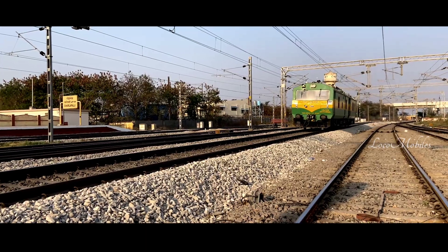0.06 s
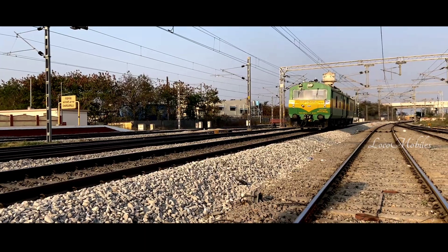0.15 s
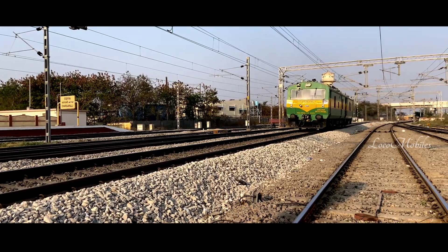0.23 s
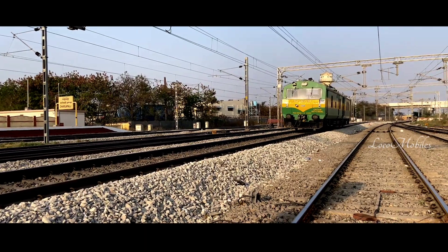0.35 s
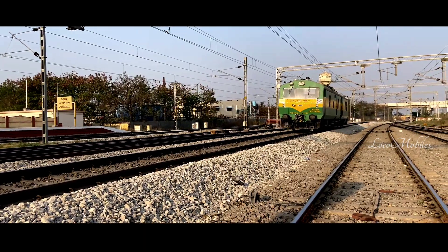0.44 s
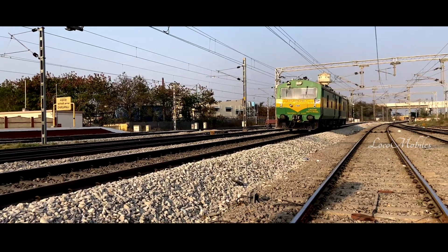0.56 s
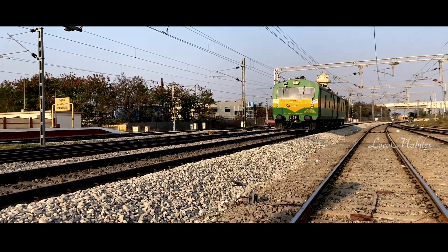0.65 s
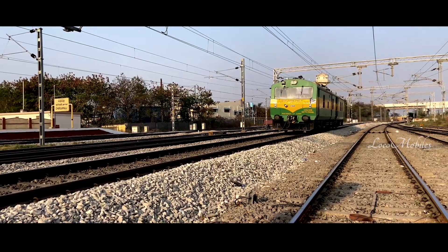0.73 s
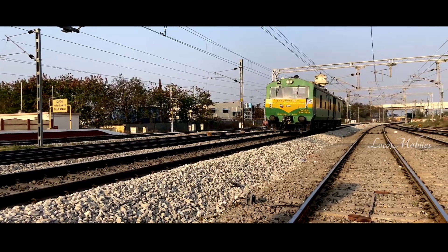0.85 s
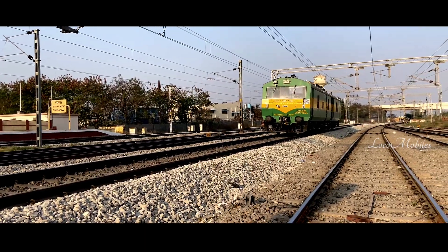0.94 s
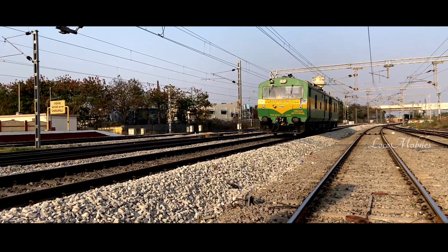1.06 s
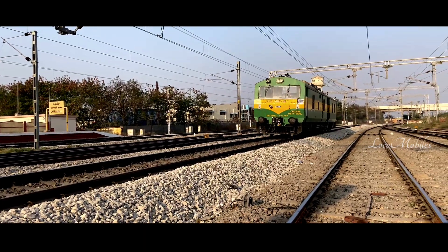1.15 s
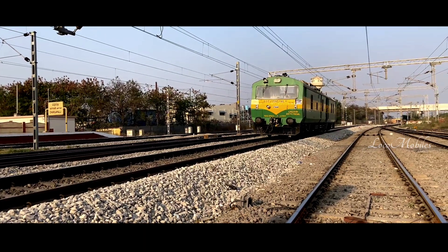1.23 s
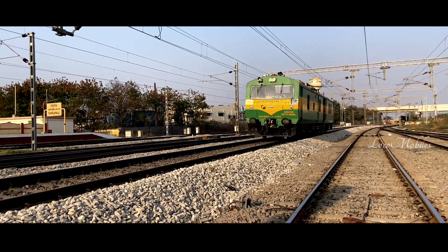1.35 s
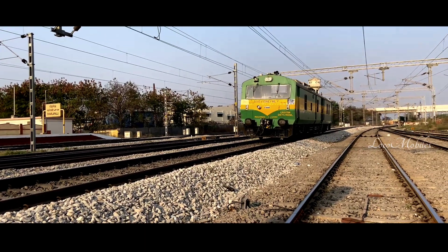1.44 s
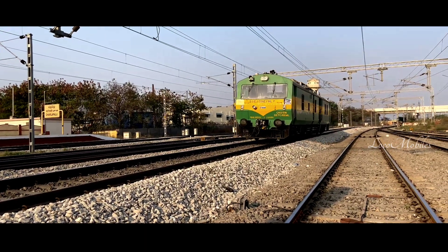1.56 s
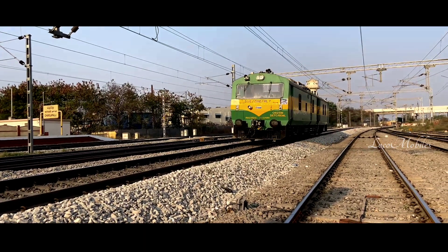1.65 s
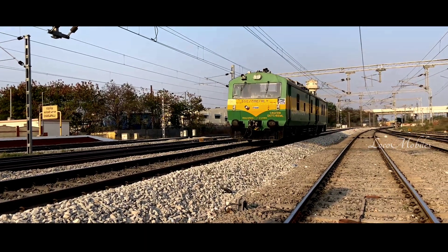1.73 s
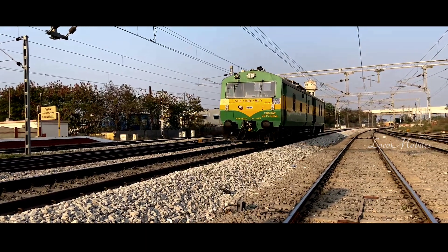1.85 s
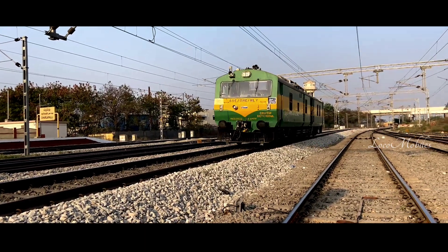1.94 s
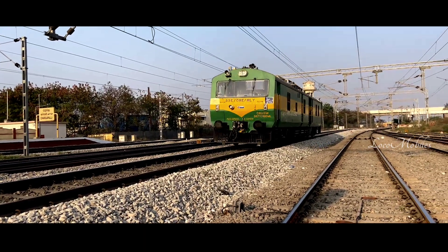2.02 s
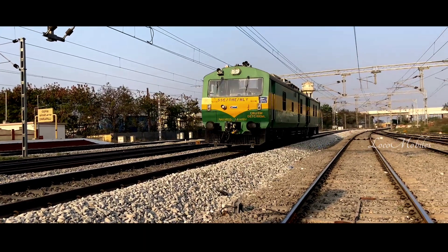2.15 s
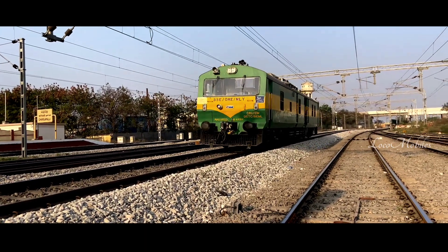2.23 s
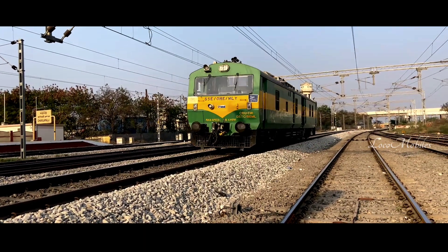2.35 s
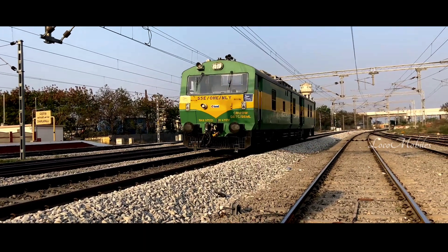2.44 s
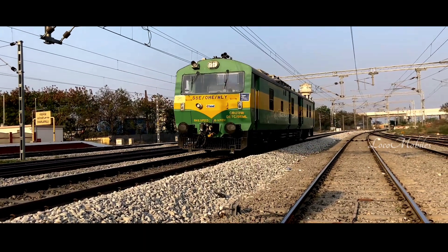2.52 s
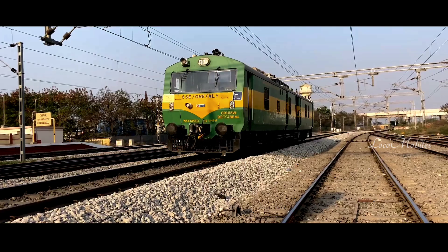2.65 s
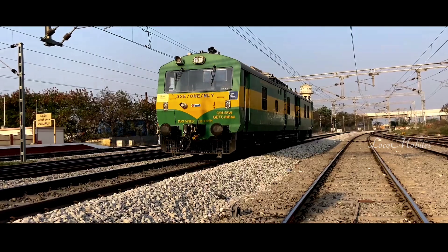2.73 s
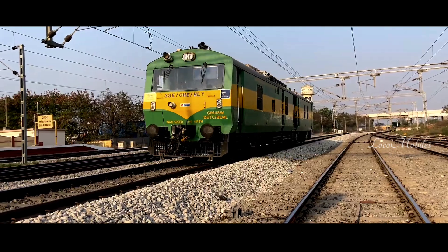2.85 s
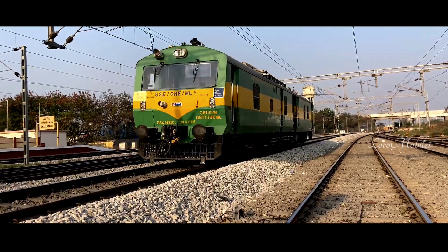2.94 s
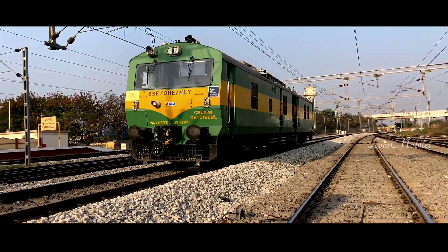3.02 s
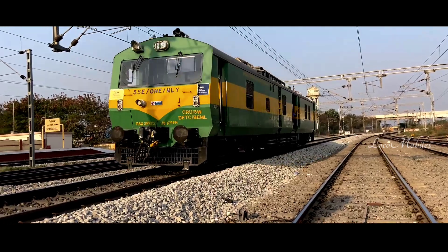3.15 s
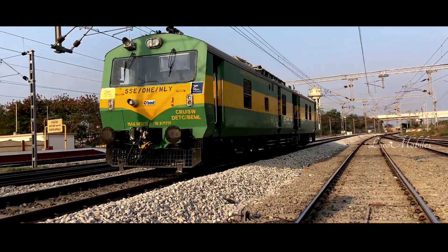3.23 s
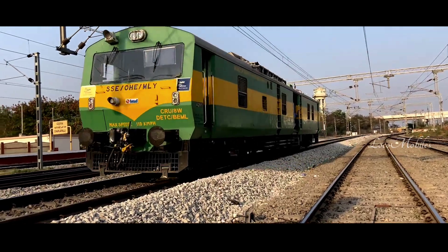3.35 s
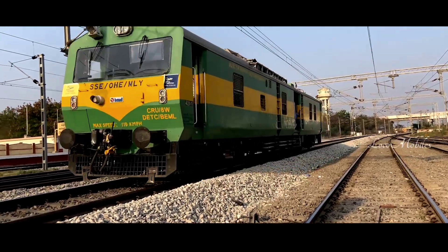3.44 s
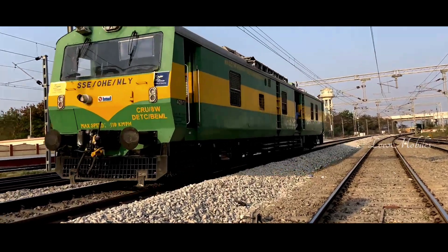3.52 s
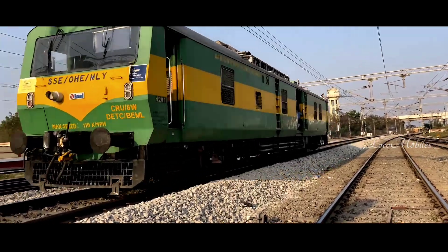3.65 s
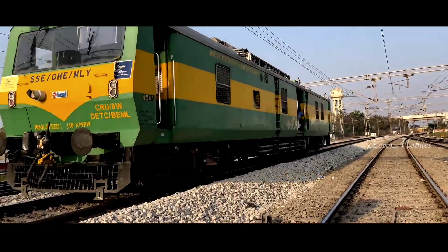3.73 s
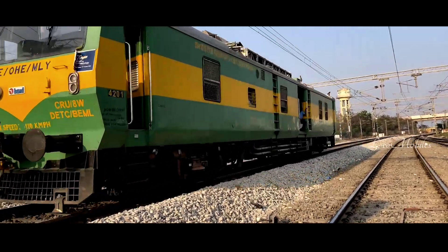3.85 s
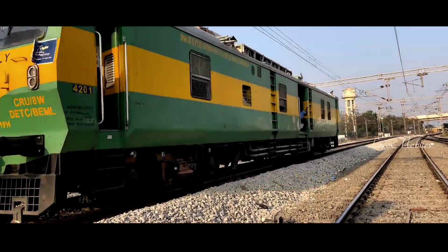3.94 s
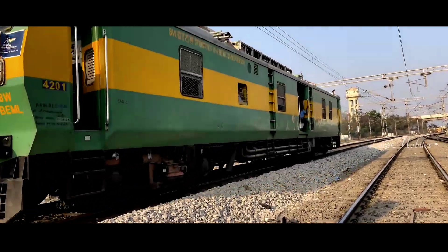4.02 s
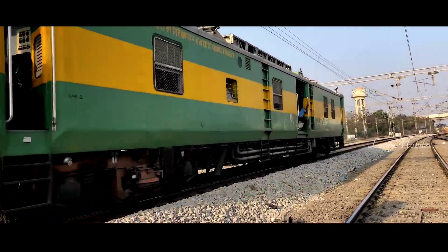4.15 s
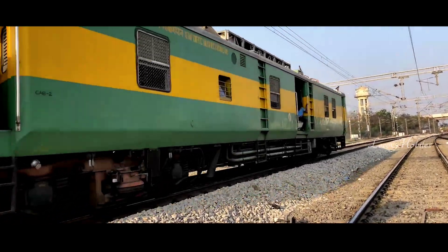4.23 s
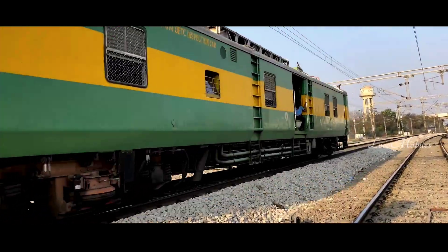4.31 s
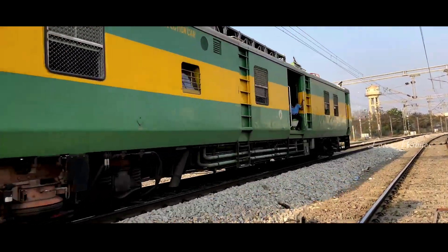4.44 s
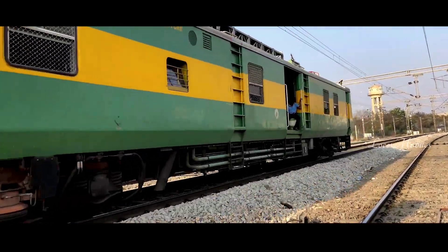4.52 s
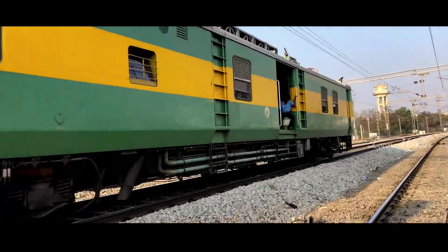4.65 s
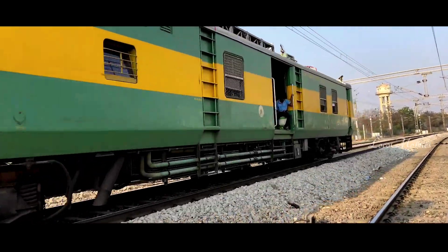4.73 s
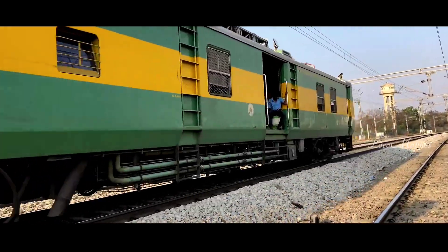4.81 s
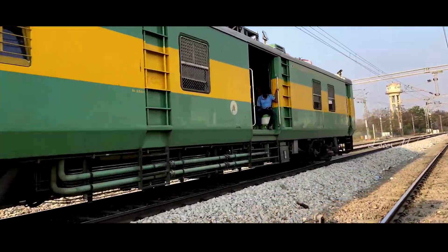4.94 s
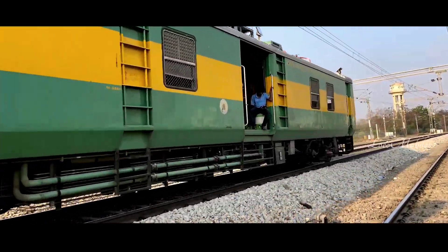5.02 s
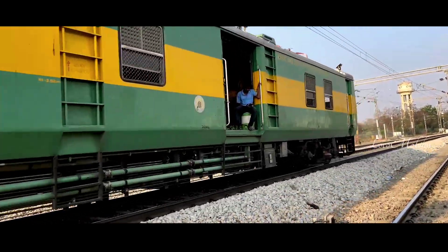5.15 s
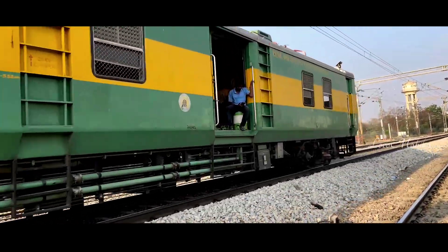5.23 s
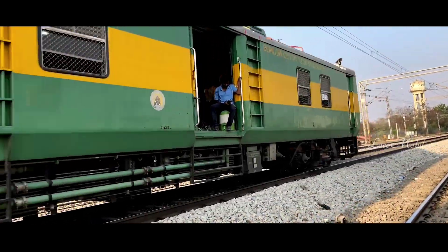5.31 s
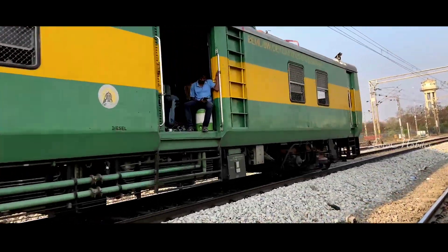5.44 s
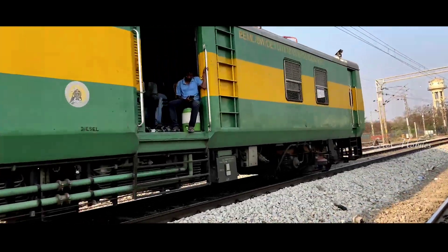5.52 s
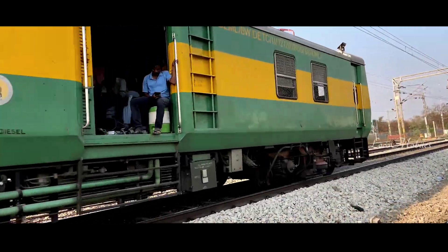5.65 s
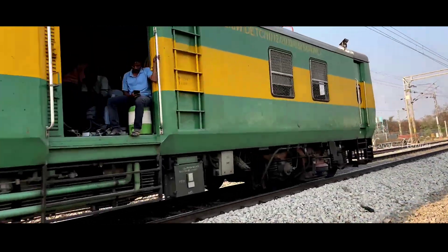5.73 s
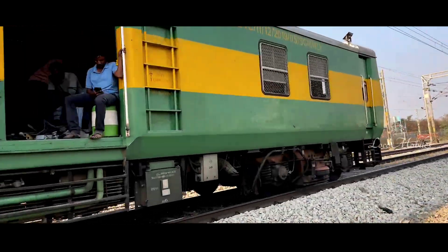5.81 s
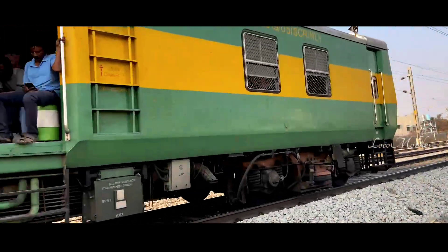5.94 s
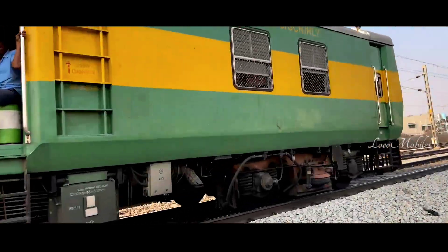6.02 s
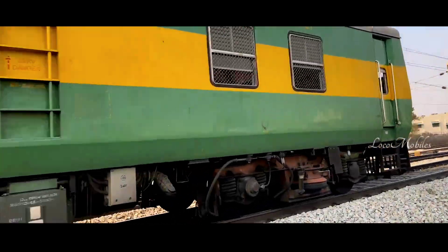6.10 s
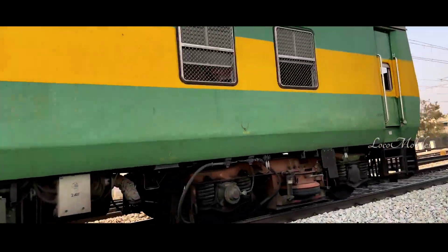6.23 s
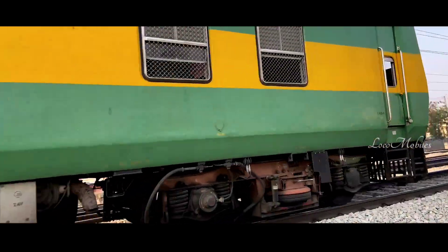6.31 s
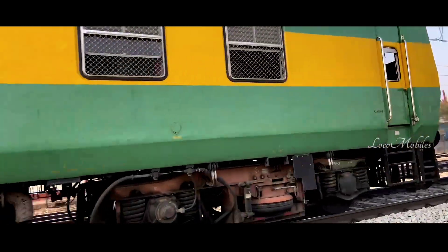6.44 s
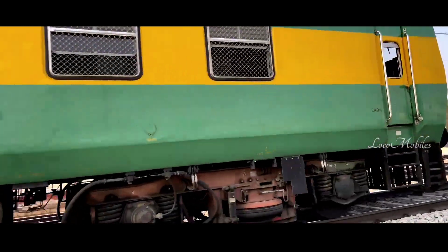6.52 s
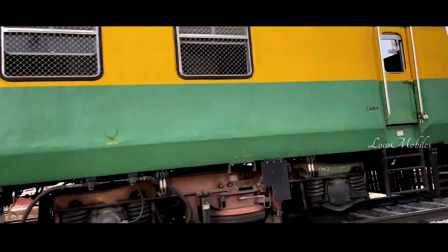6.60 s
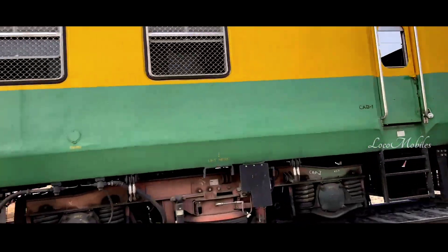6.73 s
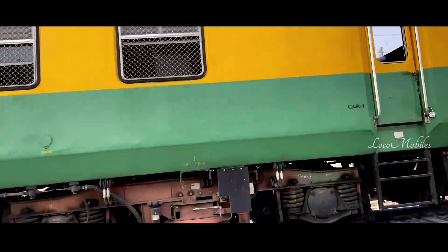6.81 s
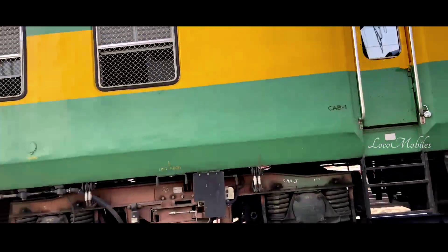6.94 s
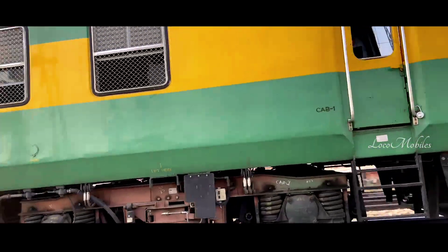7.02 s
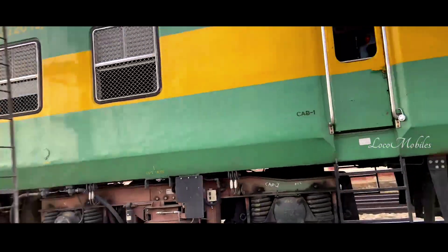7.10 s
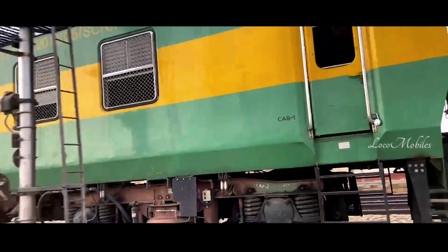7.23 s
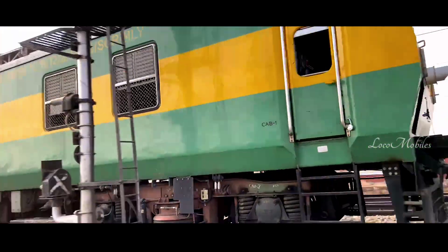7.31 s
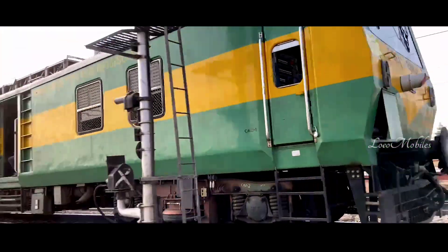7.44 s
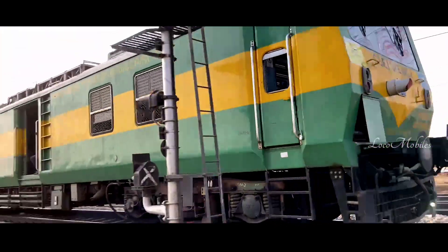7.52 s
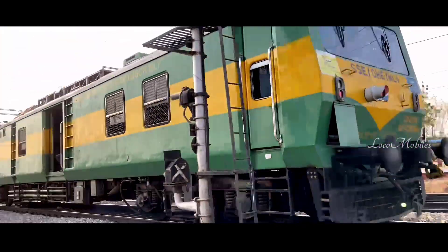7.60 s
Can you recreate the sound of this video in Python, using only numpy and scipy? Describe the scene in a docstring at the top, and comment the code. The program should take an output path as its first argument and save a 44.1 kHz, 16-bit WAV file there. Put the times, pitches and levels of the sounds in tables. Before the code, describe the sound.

Low steady diesel drone grows as the throttle opens, wheels and engine clatter roar past at a few metres, with faint whistle and light wind buffeting.

```python
"""A diesel railcar nears through a station yard: exhaust booms at the firing rate, engines growl, hum, whistle
and clatter (tones, shaped noise beaten by the firings), wheels roar, dull knocks sound, a breeze buffets two ports.
The throttle opens in two steps and air hisses once on the way in (noise under a level curve).
The car passes a few metres to the left, levels going as 1 / r; loose parts buzz as resonant noise.
Last, the rear engine's covers ring with uneven ticks, and the body screens the engine sounds."""
import sys
import numpy as np
from scipy import signal
from scipy.fft import rfft, irfft, next_fast_len
from scipy.io import wavfile
from scipy.ndimage import uniform_filter1d, map_coordinates

SR = 44100
rng = np.random.default_rng(int(sys.argv[2]) if len(sys.argv) > 2 else 0)


def wav_out(sig):
    """Save sig, one row per channel (or a flat mono array), as 16-bit PCM at SR to the path in sys.argv[1]."""
    wavfile.write(sys.argv[1], SR, np.round(np.clip(np.atleast_2d(sig).T, -1, 1) * 32767).astype(np.int16))


N = 338158
TIME = np.arange(N) / SR

# driver opens the throttle in two steps: t/s, exhaust strength/dB
THROTTLE = [(0.0, -23), (0.5, -16), (0.72, -9.5), (1.78, -11.5), (1.92, -3.5), (2.7, 0)]
# rear engine, which stays ahead for longer: t/s, lead of left port/ms, share of direct sound (0-1)
REAR_PLACE = [(0, -0.11, 0.07), (1.7, -0.041, 0.42), (3.9, -0.019, 0.3), (4.6, 0.01, 0), (5.9, -0.059, 0.1),
              (6.5, 0.27, 0.07), (7.05, 0.29, 0.45), (7.4, 0.18, 0.18)]
BOOM_DB, BOOM_DISTANCE_M = -11.9, 19  # abreast, before throttle and fades; the boom carries far
FLICKER_DB = 1.8  # size of the random flicker in the clatter


def undb(db):
    """Decibels to gain."""
    return 10 ** (np.asarray(db) / 20)


def curves(table):
    """Each column of a table, joined by straight lines in time."""
    s, *columns = np.transpose(table)
    return [np.interp(TIME, s, c) for c in columns]


def unit(x):
    """Scale to rms 1."""
    return x / np.sqrt(np.mean(x ** 2))


def noise(channels=2):
    """Unrelated white noise for each channel."""
    return rng.standard_normal((channels, N))


def walk(rate_hz):
    """Random levels held 1 / rate s and slewed; rms 1."""
    hold = int(SR / rate_hz)
    steps = np.repeat(rng.standard_normal(N // hold + 1), hold)
    slewed = uniform_filter1d(uniform_filter1d(steps, hold), hold)
    return unit(slewed[:N])


def colour(x, spectrum):
    """Give x a spectrum of (Hz, dB) points; rms 1."""
    size = next_fast_len(N, True)
    f = np.maximum(np.fft.rfftfreq(size, 1 / SR), 1)
    hz, db = np.transpose(spectrum)
    gain = undb(np.interp(np.log(f), np.log(hz), db, left=-80, right=-80))
    return unit(irfft(rfft(x, size) * gain, size)[..., :N])


def ports(x, lead_ms):
    """A sound from one side reaches the two ports at different times."""
    half = lead_ms / 2000 * SR  # samples
    return np.array([map_coordinates(x, [np.arange(N) + side * half], order=3, mode="nearest")
                     for side in (1, -1)])


def diffuse(lead_ms):
    """Diffuse sound; part of it reaches both channels with fixed delays, mostly from the car's side."""
    # two fixed delays between the channels: delay/ms
    delays_ms = [0.28, 0.44]
    delayed_share, left_lean = 0.59, 0.2
    share = np.clip(delayed_share, 0, 1)
    lean = np.clip(left_lean + lead_ms / max(delays_ms), -1, 1)
    out = np.sqrt(1 - share) * noise()
    for ms in delays_ms:
        for side in (1, -1):
            wave = noise(channels=1)[0] * np.sqrt(share * (1 + side * lean) / (2 * len(delays_ms)))
            out += [wave, np.roll(wave, side * round(ms * SR / 1000))]
    return out


def radiate(x, lead_ms, direct):
    """The direct sound plus noise for its scatter from ballast and underframe."""
    direct = np.clip(direct, 0, 1)
    return np.sqrt(direct) * ports(x, lead_ms) + np.sqrt(1 - direct) * diffuse(lead_ms)


def nearness(behind_m, distance_m):
    """Gain 1 / r of a point on the moving car; 1 when it is abreast."""
    speed_m_s, front_abreast_s = 7.27, 4.214
    along_m = speed_m_s * (TIME - front_abreast_s) - behind_m
    return distance_m / np.hypot(along_m, distance_m)


def heard(sound):
    """Gain of one sound: its places on the car add in power, and its fades cut into it."""
    # where sounds leave the car: sound, behind front/m, effective distance/m, level abreast before fades/dB
    sources = [("boom", 3.9, BOOM_DISTANCE_M, BOOM_DB), ("second harmonic", 5, 1.4, -31),
               ("second harmonic", 18.2, 3.2, -24), ("fourth harmonic", -14, 5, -32),
               ("fourth harmonic", 3, 4, -31), ("fourth harmonic", 21, 4, -32), ("hum", 2.3, 5.3, -18),
               ("hum", 19.6, 1.34, -17.2), ("hum octave", -6, 10, -34.5), ("hum octave", 7.6, 1.7, -29),
               ("hum octave", 14, 1.1, -31), ("hum twelfth", 13.5, 2, -38), ("gear", 14, 2, -31),
               ("gear", 20.5, 2, -28), ("fan", 5, 1.95, -26), ("fan", 13.2, 0.5, -21.5),
               ("fan", 21.3, 2.1, -24), ("final drive", 4.8, 0.8, -18.5), ("final drive", 12.4, 0.6, -26),
               ("final drive", 18.5, 1.4, -23.5), ("growl", 5, 5.2, -19.5), ("growl", 17.5, 3.9, -23.6),
               ("wheels", 8, 7.24, -20.5), ("block", 8.4, 6.77, -26), ("injectors", 11.8, 6.4, -28),
               ("injectors", 19.5, 3.3, -33.5), ("turbo", 11.7, 4.8, -36), ("turbo", 19.4, 1.3, -35),
               ("tapping", 20.5, 1.05, -26.3)]
    # direct and reflected waves cancel, or add where loss < 0: sound, t/s, half length to 1/e/s, loss/dB
    fades = [("boom", 4.95, 0.2, 3), ("boom", 5.1, 0.08, 22), ("boom", 5.24, 0.09, 19),
             ("boom", 5.88, 0.1, 9.5), ("boom", 3.61, 0.05, 4.5), ("boom", 6.8, 0.18, -1.7),
             ("boom", 6.2, 0.2, -1.2), ("boom", 4.0, 0.3, -1.1), ("hum", 1.77, 0.23, 5.4),
             ("hum", 2.73, 0.16, 14.4), ("hum", 3.39, 0.15, 8), ("hum", 3.68, 0.12, -6.5),
             ("hum", 3.89, 0.045, 18), ("hum", 4.16, 0.095, 25), ("hum", 4.48, 0.089, 2.1),
             ("hum", 5.14, 0.04, -4), ("hum", 5.35, 0.13, 7.5), ("hum", 6.68, 0.08, 9),
             ("hum", 6.15, 0.25, 3), ("hum", 4.87, 0.09, 3), ("hum", 3.08, 0.07, -3.5),
             ("hum", 7.47, 0.14, 9.7), ("growl", 5.33, 0.12, 7.9), ("fan", 5.38, 0.12, 16),
             ("fan", 6.55, 0.12, 13), ("final drive", 5.33, 0.1, 10), ("final drive", 5.8, 0.17, 12),
             ("final drive", 7.15, 0.1, 6), ("second harmonic", 5.3, 0.25, 12),
             ("second harmonic", 7.45, 0.2, 8)]
    power = sum((undb(db) * nearness(behind_m, distance_m)) ** 2
                for name, behind_m, distance_m, db in sources if name == sound)
    loss_db = sum(db * np.exp(-((TIME - s) / length_s) ** 2)
                  for name, s, length_s, db in fades if name == sound)
    return np.sqrt(power) * undb(-loss_db)


def shade():
    """Once the rear is by, the body screens exhaust, injectors and turbocharger ever more."""
    rear_abreast_s, shade_db_per_s = 7.19, 11
    return undb(-shade_db_per_s * np.maximum(TIME - rear_abreast_s, 0))


def line(cycles, flutter_db, wander_rad):
    """A tone of about rms 1 whose size and phase waver."""
    wave = np.sqrt(2) * np.sin(2 * np.pi * cycles + wander_rad * walk(22))
    return wave * undb(flutter_db * walk(25))


def strokes(firings, repeat, count=6):
    """Engine noise, part of which comes back with every few firings."""
    pattern = rng.standard_normal(int(count * SR * TIME[-1] / firings[-1]))
    again = pattern[(firings / count % 1 * len(pattern)).astype(int)]
    repeat = np.clip(repeat, 0, 1)
    return np.sqrt(repeat) * again + np.sqrt(1 - repeat) * noise(channels=1)[0]


def beating(firings, depth, scatter_db):
    """Gain of a part struck by every firing, each time with its own force and a soft edge."""
    force_db = scatter_db * rng.uniform(-np.sqrt(3), np.sqrt(3), int(firings[-1]) + 1)
    force = undb(force_db)[firings.astype(int)]
    burst = uniform_filter1d(force * np.exp(-(firings % 1) / 2.2), size=SR // 400)
    swell = 1 + depth * (burst / burst.mean() - 1)
    return swell / np.sqrt(uniform_filter1d(swell ** 2, size=SR // 4))


def flicker(x, spread_db, size=3):
    """Noise with random level flicker in small patches of time and frequency; rms 1."""
    z = signal.stft(x, nperseg=512)[2]
    patches = rng.standard_normal(z.shape[1:])
    patches = uniform_filter1d(uniform_filter1d(patches, size, axis=0), size, axis=1)
    return unit(signal.istft(z * undb(spread_db * unit(patches)))[1][:, :N])


def resonance(hz, width_hz, lead_ms, direct):
    """Noise in one resonance whose centre may move."""
    lowpass = signal.butter(2, width_hz / 2, fs=SR, output="sos")
    slow = signal.sosfilt(lowpass, noise(channels=3) + 1j * noise(channels=3))
    carrier = np.exp(2j * np.pi * np.cumsum(hz * np.ones(N)) / SR)
    common, *own = unit(np.real(slow * carrier))
    direct = np.clip(direct, 0, 1)
    return np.sqrt(direct) * ports(common, lead_ms) + np.sqrt(1 - direct) * np.array(own)


def exhaust(firings, lead_ms):
    """Boom at the firing rate and its fourth harmonic, both stronger with throttle."""
    throttle_db = curves(THROTTLE)[0]
    boom = heard("boom") * undb(throttle_db) * shade()
    out = boom * line(firings, flutter_db=0.94, wander_rad=0.081)
    fourth = heard("fourth harmonic") * undb(0.5 * throttle_db)
    out += fourth * line(4 * firings, flutter_db=1.8, wander_rad=0.15)
    return ports(out, 0.4 * lead_ms)


def engine_hum(hum_hz, lead_ms):
    """Engine hum with octave and twelfth; it only comes through once the engine pulls."""
    load_db_per_db = 0.19  # gain per dB of throttle
    cycles = np.cumsum(hum_hz) / SR
    hum = heard("hum") * line(cycles, flutter_db=1.3, wander_rad=0.12)
    hum += heard("hum octave") * line(2 * cycles, flutter_db=1.6, wander_rad=0.12)
    hum += heard("hum twelfth") * line(3 * cycles, flutter_db=5.0, wander_rad=0.3)
    pulling = np.interp(TIME, [1.1, 1.35], [0.25, 1]) * undb(load_db_per_db * curves(THROTTLE)[0])
    return ports(pulling * hum, 2.0 * lead_ms)


def machinery(firings, lead_ms):
    """Tones of exhaust second harmonic, fan blades, final drive and gear under the floor."""
    # final drive, tied to road speed: t/s, f/Hz
    drive_pitch = [(3, 219.7), (4.9, 224.5), (6.7, 234.7), (7.67, 232)]
    # gear whine at the rear, falling as it goes by: t/s, f/Hz
    gear_pitch = [(5.9, 386.5), (6.4, 385), (6.9, 379), (7.5, 375)]
    fan_ratio = 2.655  # blade passes per firing
    drive_cycles = np.cumsum(curves(drive_pitch)[0]) / SR
    gear_cycles = np.cumsum(curves(gear_pitch)[0]) / SR
    near = heard("second harmonic") * line(2 * firings, flutter_db=2.0, wander_rad=0.091)
    near += heard("fan") * line(fan_ratio * firings, flutter_db=1.5, wander_rad=0.12)
    near += heard("final drive") * line(drive_cycles, flutter_db=1.4, wander_rad=0.13)
    near += heard("gear") * line(gear_cycles, flutter_db=5.0, wander_rad=0.38)
    return ports(near, 2.0 * lead_ms)


def engine_growl(firings, lead_ms):
    """Low engine noise, chugging with the firings and louder with throttle."""
    # growl: f/Hz, relative density/dB per Hz
    growl_spectrum = [(20, -12), (40, -21), (80, 1.5), (115, -12), (170, -1.5), (250, -1.5), (340, -1.7),
                      (420, -3.5), (520, -26.5), (900, -9)]
    load_db_per_db = 0.5  # gain per dB of throttle
    chug = strokes(firings, repeat=0.39) * beating(firings, 1.0, scatter_db=2.5)
    growl = colour(ports(chug, 0.85 * lead_ms), growl_spectrum)
    return heard("growl") * undb(load_db_per_db * curves(THROTTLE)[0]) * growl


def breeze():
    """Gusts of low noise that sweep across the ports from the right, mostly unrelated between them."""
    # wind: f/Hz, relative density/dB per Hz
    wind_spectrum = [(20, -19), (45, 1), (85, 7), (135, -3), (260, 0), (420, -6), (600, -22.5), (1200, -23)]
    # breeze on the ports: t/s, level/dB
    breeze_level = [(0, -29), (0.4, -32), (1.05, -30), (1.4, -32), (2.15, -32), (2.35, -20.5), (3.1, -18.5),
                    (3.8, -15.5), (4.95, -17.5), (5.12, -27), (6.3, -25), (7.67, -20.5)]
    eddies = colour(ports(noise(channels=1)[0], lead_ms=-1.37) + 2.3 * noise(), wind_spectrum)
    gusts = unit(eddies * undb(2.4 * np.array([walk(24), walk(24)])))
    return undb(curves(breeze_level)[0]) * gusts


def wheels(firings, lead_ms, direct):
    """Rolling roar with some engine note in it; louder at the port that faces the track."""
    # wheels: f/Hz, relative density/dB per Hz
    wheel_spectrum = [(300, 0), (480, -6), (600, -0.5), (730, 1.9), (900, -2.5), (1080, -5), (1300, -11),
                      (1800, -31.5), (3000, -72)]
    far_roll_db = -37.5  # the rails carry the roar ahead of the car
    rolling = radiate(strokes(firings, repeat=0.5), lead_ms, direct + 0.13)
    roar = colour(flicker(rolling, spread_db=1.1), wheel_spectrum)
    pan_db = 1.7 + 8 * lead_ms
    facing = undb(np.array([pan_db, -pan_db]) / 2)
    facing = facing / np.sqrt(np.mean(facing ** 2, axis=0))
    level = np.hypot(heard("wheels"), undb(far_roll_db))
    return level * roar * facing * undb(0.78 * walk(24))


def engine_block(firings, lead_ms, direct, beat):
    """Every firing knocks the block: noise beaten at the firing rate."""
    # block: f/Hz, relative density/dB per Hz
    block_spectrum = [(900, -22), (1350, 4), (1560, 6.5), (1900, 0.5), (2260, -1), (2600, -8.5),
                      (4000, -23.5)]
    knocking = flicker(radiate(strokes(firings, repeat=0.26), lead_ms, direct), FLICKER_DB)
    knocking = colour(knocking * beating(firings, 0.44 * beat, scatter_db=5.5), block_spectrum)
    return heard("block") * knocking


def chinks(count=1200):
    """Countless small metal contacts in the running gear, each a short ring of its own pitch; rms 1."""
    out = np.zeros(N + SR)
    age = np.arange(SR // 25) / SR
    for when, pitch, force, damping in rng.random((count, 4)):
        hz = 1500 * 3.1 ** pitch
        decay_s = 0.004 + 0.008 * damping
        onset = np.minimum(age / 0.0005, 1)
        ring = np.sin(2 * np.pi * hz * age) * np.exp(-age / decay_s) * onset
        start = int(when * N)
        out[start:start + len(age)] += undb(6 * force) * ring
    return unit(out[:N])


def injectors(firings, beat):
    """Every firing ticks an injector, as beaten noise; the running gear chinks along."""
    # injectors: f/Hz, relative density/dB per Hz
    injector_spectrum = [(1700, -7), (2500, -0.5), (3100, 4.5), (3800, 1.5), (4500, -4), (5400, -7),
                         (6600, -6.5), (7400, -10.5), (8200, -59.5), (10500, -12), (12000, -26.5)]
    rear_ms, rear_direct = curves(REAR_PLACE)
    ticks = flicker(radiate(strokes(firings, repeat=0.25), rear_ms, rear_direct), FLICKER_DB)
    ticks = colour(ticks * beating(firings, 0.35 * beat, scatter_db=7.0), injector_spectrum)
    metal = ports(chinks(), rear_ms) * undb(-9)
    return heard("injectors") * shade() * (metal + ticks)


def turbo(firings, lead_ms, direct, beat):
    """A breathy whistle that climbs as the rotor spools up and throbs with the exhaust pulses."""
    top_hz, rise_hz, spool_s = 6640, 912, 2.2
    hz = top_hz - rise_hz * np.exp(-TIME / spool_s)
    throb = beating(firings, 1.24 * beat, scatter_db=3.5)
    return heard("turbo") * shade() * throb * resonance(hz, 360, lead_ms, 1.8 * direct)


def knocks():
    """Short dull knocks: a swell of noise in one broad resonance, mostly alike at both ports."""
    # knocks: t/s, peak/dB, f/Hz, decay/s, width/octaves
    knock_table = [(0.09, -21, 260, 0.033, 0.98), (0.211, -16.5, 413, 0.0067, 0.5),
                   (0.225, -17, 220, 0.018, 1.75), (0.557, -17.5, 114, 0.0067, 2.9),
                   (0.795, -17.5, 320, 0.0033, 0.51), (1.024, -19.5, 330, 0.0078, 0.74),
                   (1.039, -17, 134, 0.004, 1.3), (2.982, -18, 351, 0.0045, 1.6),
                   (3.937, -6.5, 540, 0.0025, 0.91)]
    out = np.zeros((2, N))
    age = np.arange(SR // 6) / SR
    for s, db, hz, decay_s, octaves in knock_table:
        burst = rng.standard_normal((2, len(age))) * age * np.exp(-age / decay_s)
        band = signal.butter(2, hz * np.sqrt([.5, 2]) ** octaves, "bandpass", fs=SR)
        ring = signal.lfilter(*band, burst + burst.mean(axis=0))
        start = int(s * SR)
        out[:, start:start + len(age)] += undb(db) * ring / np.abs(ring).max()
    return out


def air():
    """Air leaks faintly, then is let off: coloured noise, unrelated at the two ports."""
    # air: t/s, level/dB
    air_level = [(1.48, -56), (1.53, -40.5), (1.63, -43), (1.85, -75.5)]
    # air: f/Hz, relative density/dB per Hz
    air_spectrum = [(1500, -19), (3000, 1.5), (8500, -8.5), (12000, -10.5)]
    return undb(curves(air_level)[0]) * colour(noise(), air_spectrum)


def rattles(firings, lead_ms, direct, beat):
    """Loose panels and pipes shaken by the firings, each heard as it goes by; their pitch wavers."""
    # rattles: t/s, half length to 1/e/s, f/Hz, level/dB
    rattle_table = [(3.4, 2.05, 1554, -40.5), (4.97, 0.74, 2264, -36), (4.93, 0.45, 880, -32),
                    (4.68, 0.32, 710, -30), (5.634, 0.05, 3244, -29.5), (6.02, 0.46, 588.6, -30.5),
                    (6.12, 0.069, 630, -23), (6.07, 0.7, 1620, -40), (6.28, 0.95, 2290, -33)]
    out = 0
    for s, length_s, hz, db in rattle_table:
        abreast = np.exp(-((TIME - s) / length_s) ** 2)
        buzz = resonance(hz + 40 * walk(40), 233, lead_ms, direct)
        out = out + undb(db) * abreast * beating(firings, 1.0 * beat, scatter_db=3) * buzz
    return out


def tapping(firings, lead_ms):
    """Beside the rear engine the firings tick unevenly; a hard tick rings mostly the cover nearest its pitch."""
    # covers of the rear engine: f/Hz, width/Hz, level before colouring/dB
    cover_modes = [(2290, 170, -2), (3030, 210, -0.5), (3730, 140, -1), (4100, 300, -6), (6600, 230, -4),
                   (7150, 250, -10)]
    # hard ticks: t/s, strength over an ordinary tick/dB, f/Hz
    hard_ticks = [(6.5625, 13, 3970), (6.6125, 9, 3000), (6.814, 8, 3060), (6.832, 8, 6700),
                  (6.882, 9.5, 2480), (6.916, 4.5, 6600), (6.9506, 4, 6610), (6.9835, 3.5, 2250),
                  (6.998, 7.5, 3750), (7.0159, 5.5, 2970), (7.0838, 7, 3700), (7.1177, 5, 2990)]
    tick_db_per_octave = 9  # covers far from a tick's pitch ring less
    tick_swell_s = 0.0028
    force_scatter_db, slop_firings = 2.4, 0.1

    def swell(age):
        """Rise and die away, peaking at the swell time."""
        return age * np.exp(-age / tick_swell_s)

    # a firing falls near the first hard tick
    count = firings - np.interp(hard_ticks[0][0], TIME, firings) + slop_firings * walk(70)
    soft = swell(count % 1 / np.gradient(firings, TIME))
    grit = radiate(noise(channels=1)[0], lead_ms, direct=0.43)
    tick = swell(np.arange(SR // 30) / SR)
    rings = 0
    for hz, width_hz, db in cover_modes:
        blows = soft * undb(force_scatter_db * walk(120))
        for s, strength_db, pitch_hz in hard_ticks:
            span = slice(int(s * SR), int(s * SR) + len(tick))
            blow_db = strength_db - tick_db_per_octave * abs(np.log2(hz / pitch_hz))
            blows[span] = np.maximum(blows[span], tick * undb(blow_db))
        ring = signal.lfilter(*signal.iirpeak(hz, hz / width_hz, fs=SR), blows * grit)
        rings = rings + undb(db) * unit(ring)
    spectrum = [(1500, -26), (2200, 4.5), (4200, -3.0), (5300, -4.5), (6500, 3), (7300, -3.5), (8000, -40)]
    return heard("tapping") * colour(rings, spectrum)


def scene():
    """The railcar going by, with one hiss of air."""
    # engine speed as heard: t/s, firing rate/Hz, hum near six times that/Hz
    engine_speed = [(0.0, 56.02, 347), (0.8, 56.36, 354.4), (2.0, 59.12, 363.4), (2.5, 60.49, 365.7),
                    (3.0, 61.14, 370.6), (4.7, 61.46, 368.2), (5.4, 61.21, 359.8), (6.3, 60.53, 360.4),
                    (7.0, 59.46, 358.7), (7.67, 59.52, 356.3)]
    # position of the car: t/s, lead of left port/ms, share of direct sound (0-1)
    car_place = [(0, -0.1, 0.14), (2.0, -0.07, 0.37), (4.1, 0.09, 0.41), (4.7, 0.071, 0.26),
                 (5.2, 0.32, 0.1), (6.2, 0.35, 0), (7.05, 0.28, 0.13), (7.4, 0.27, 0.05)]
    firing_hz, hum_hz = curves(engine_speed)
    lead_ms, direct = curves(car_place)
    rear_ms, rear_direct = curves(REAR_PLACE)
    # depth of the throb at the firing rate: harder beside the rear engine
    beat = 0.22 + 0.74 * nearness(behind_m=21, distance_m=3.2) ** 2
    firings = np.cumsum(firing_hz) / SR
    out = exhaust(firings, lead_ms) + engine_hum(hum_hz, lead_ms) + machinery(firings, lead_ms)
    out += engine_growl(firings, lead_ms) + breeze()
    out += wheels(firings, lead_ms, direct)
    out += engine_block(firings, lead_ms, direct, beat) + injectors(firings, beat)
    out += turbo(firings, rear_ms, rear_direct, beat)
    out += knocks() + air()
    out += rattles(firings, lead_ms, direct, beat)
    return out + tapping(firings, rear_ms)


def record(dry):
    """The phone rounds the top peaks and cuts the highs."""
    top_hz = 11900
    rounded = dry / (1 + dry ** 8) ** (1 / 8)
    return signal.sosfilt(signal.ellip(8, .2, 70, top_hz, fs=SR, output="sos"), rounded)


dry = scene()
out = record(dry)
wav_out(out)
```